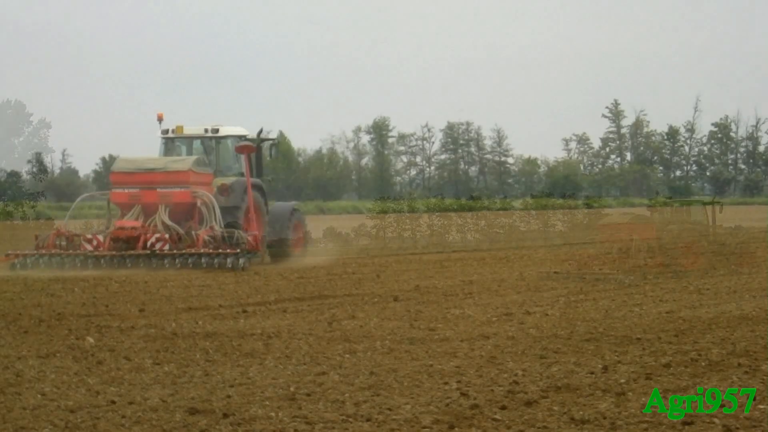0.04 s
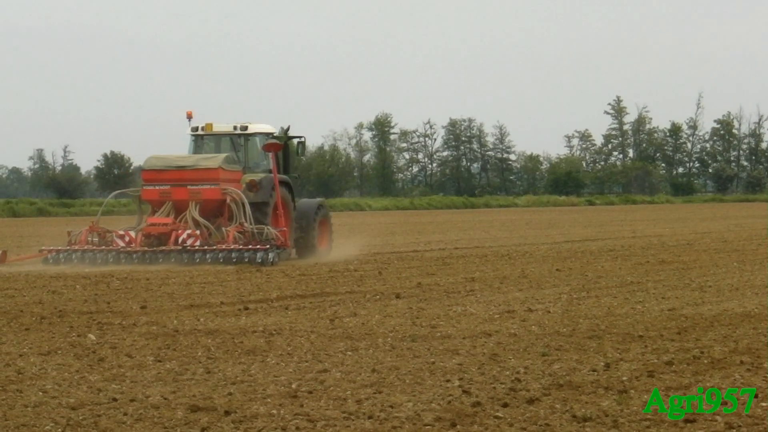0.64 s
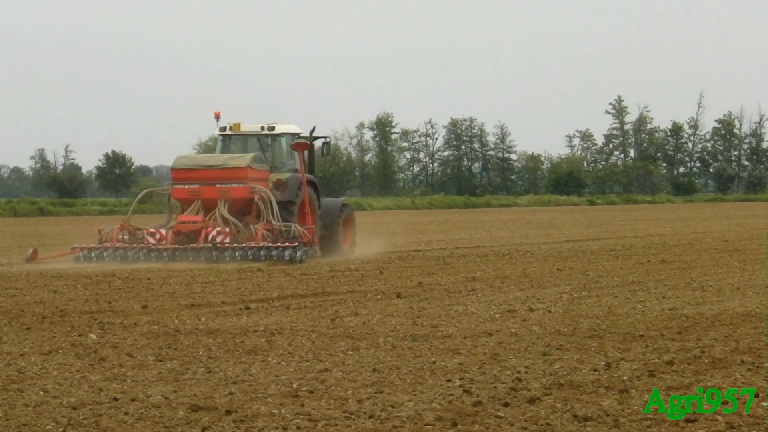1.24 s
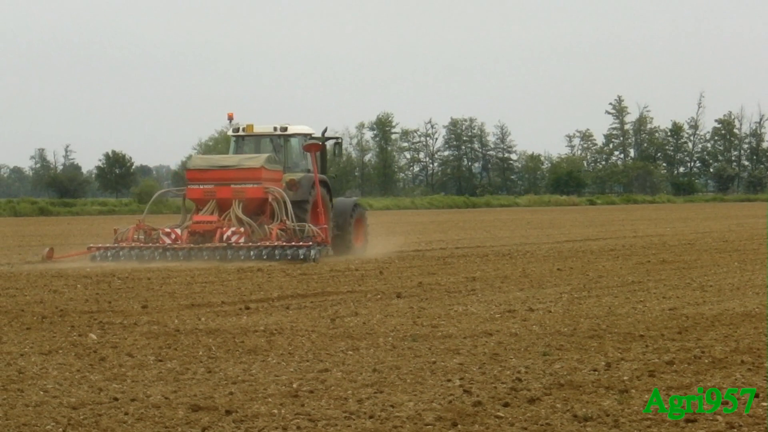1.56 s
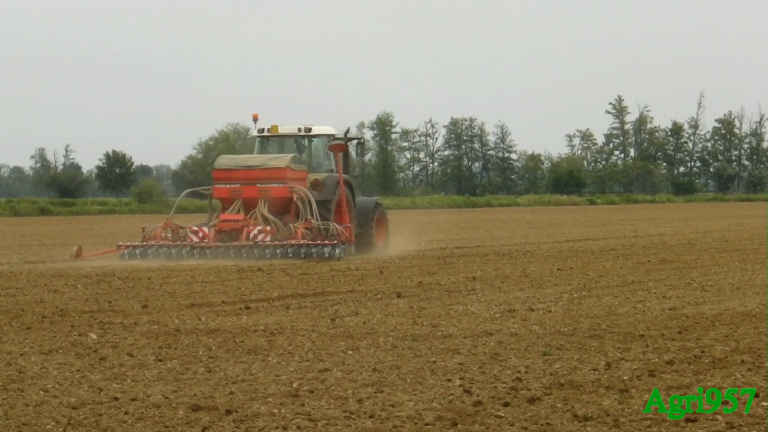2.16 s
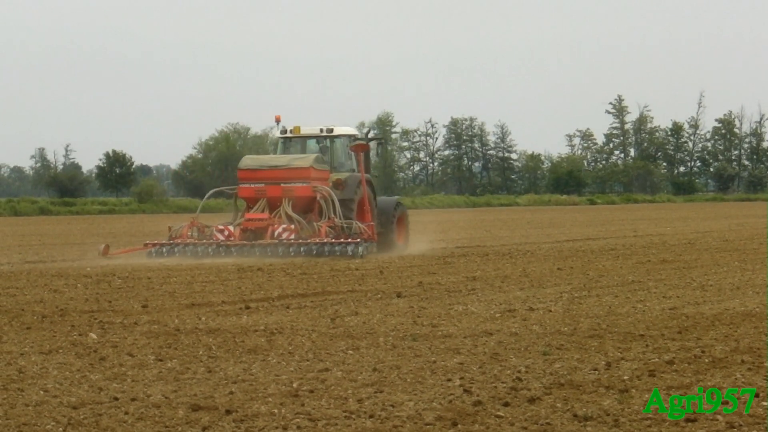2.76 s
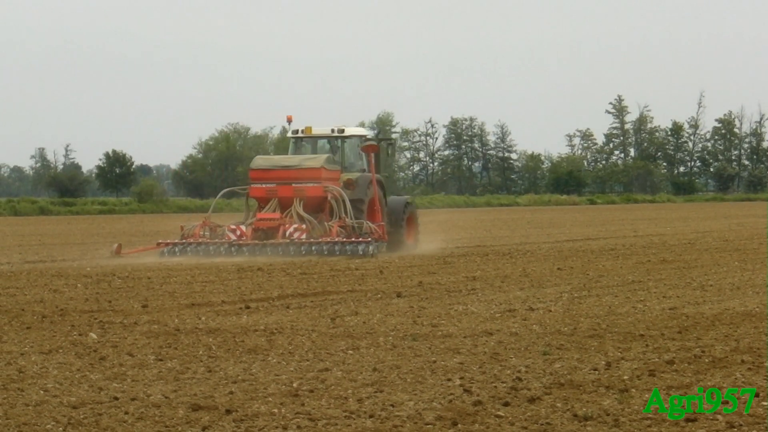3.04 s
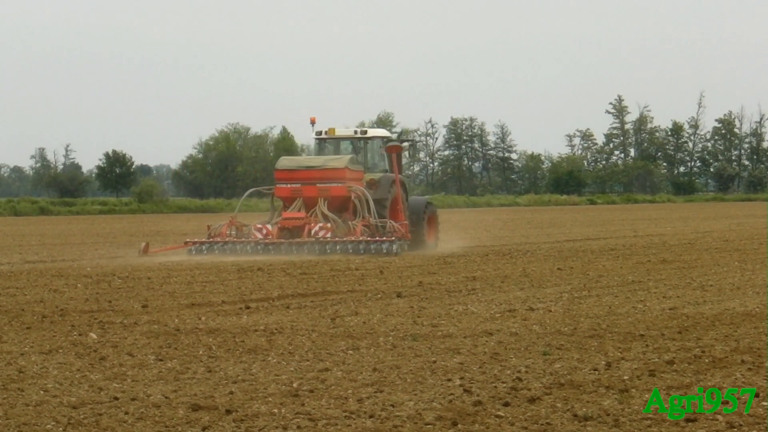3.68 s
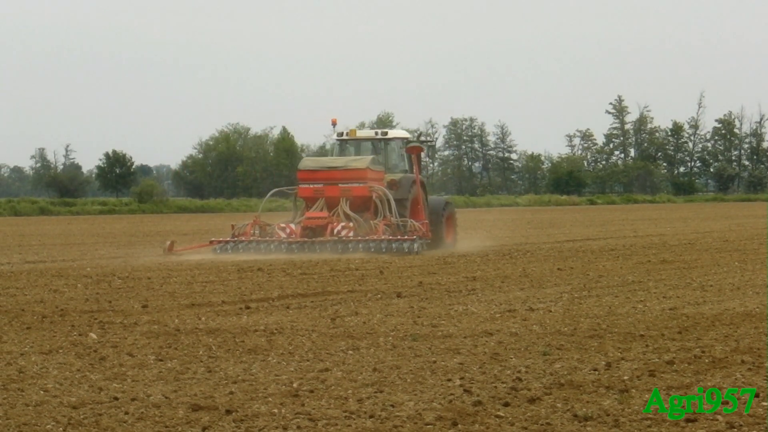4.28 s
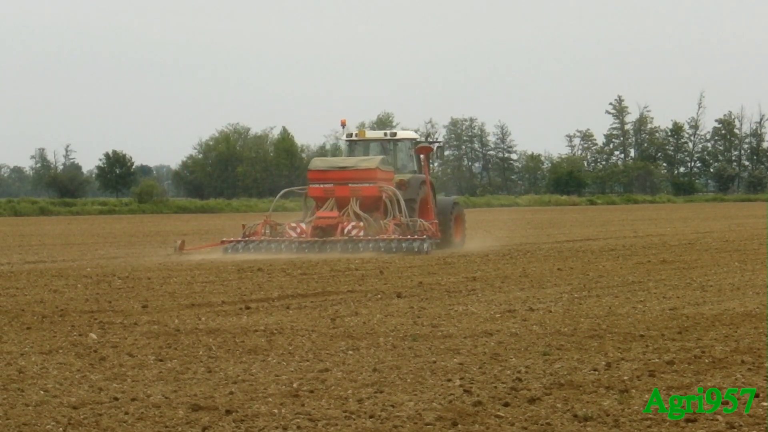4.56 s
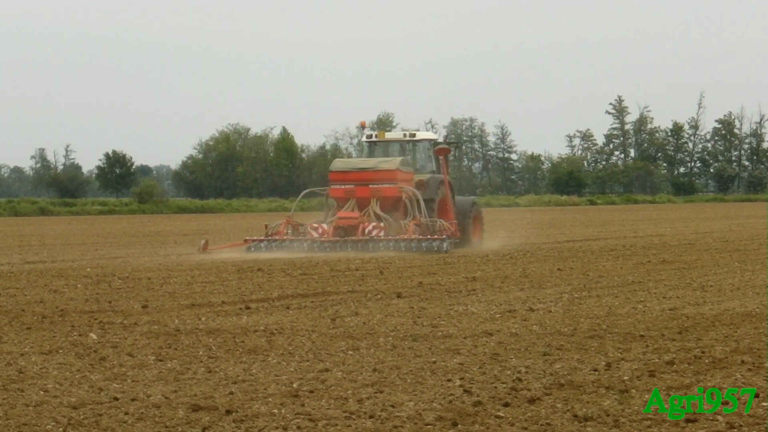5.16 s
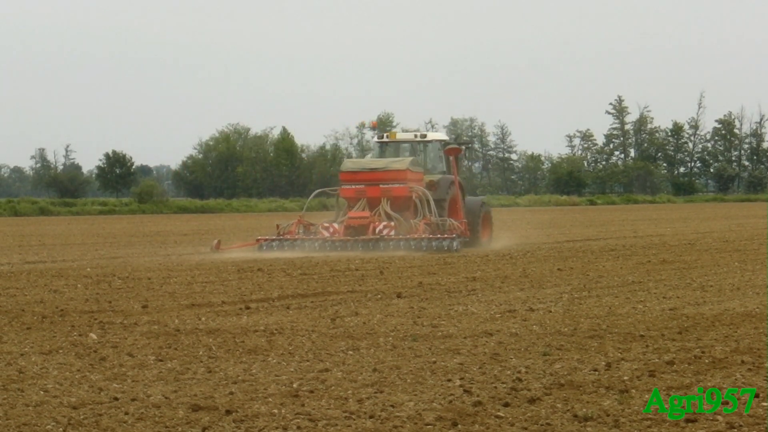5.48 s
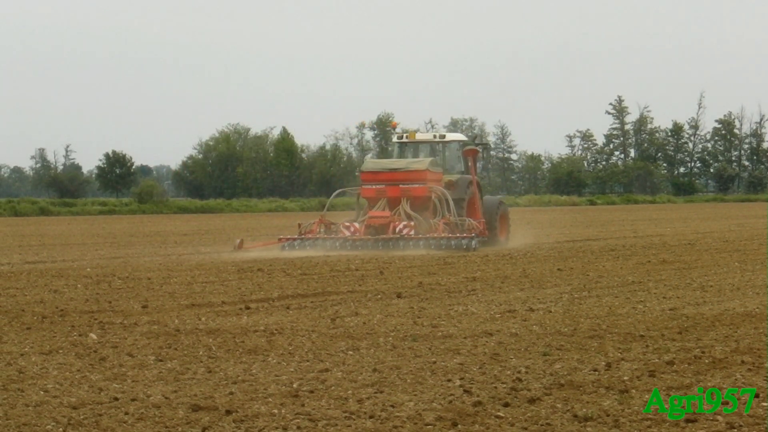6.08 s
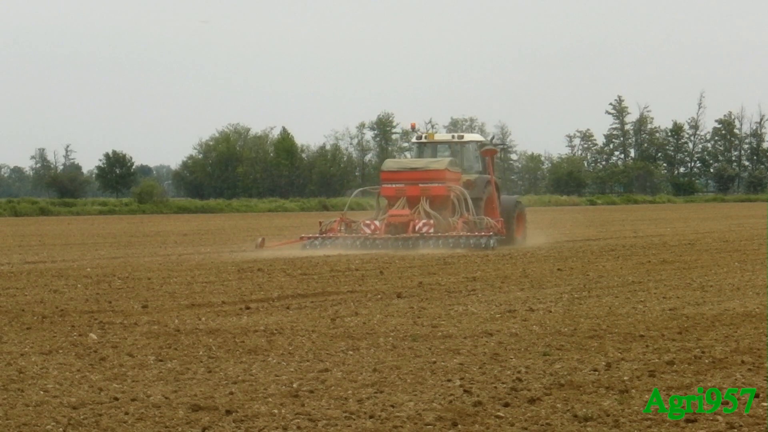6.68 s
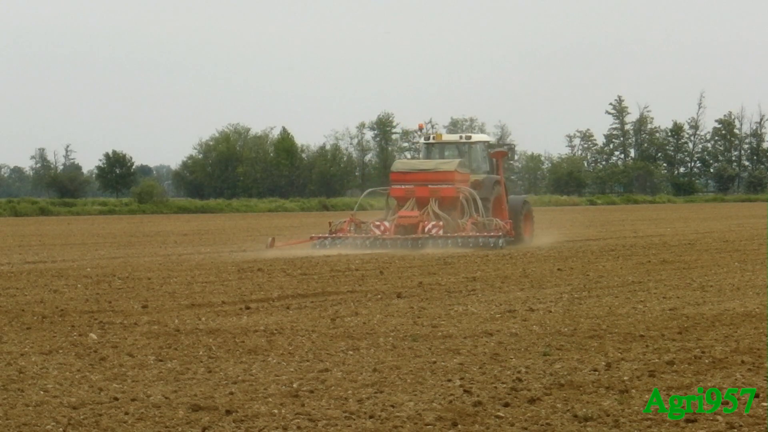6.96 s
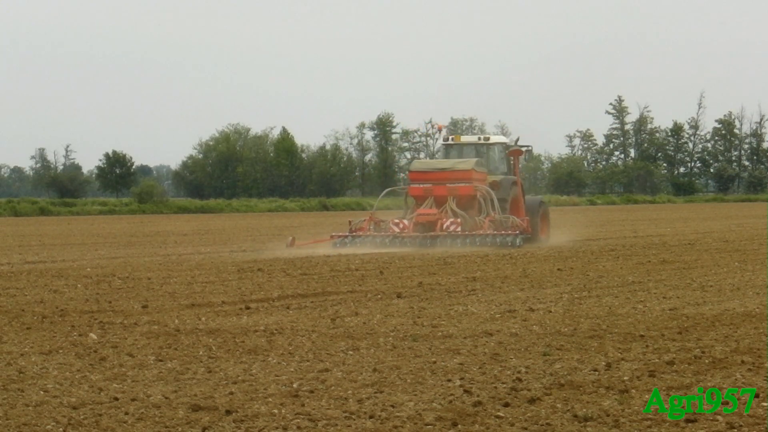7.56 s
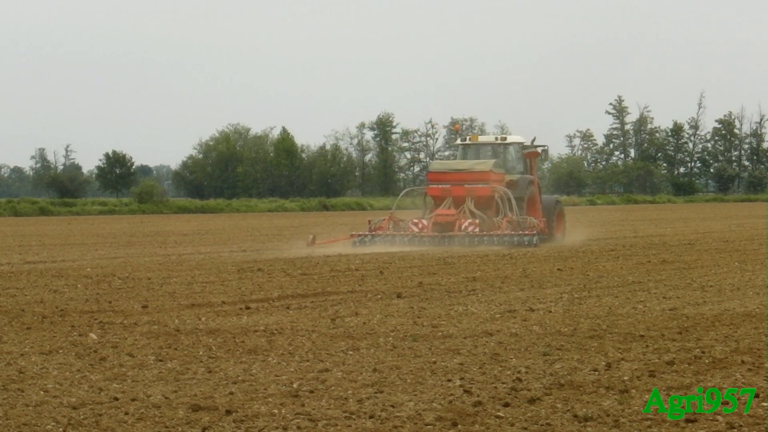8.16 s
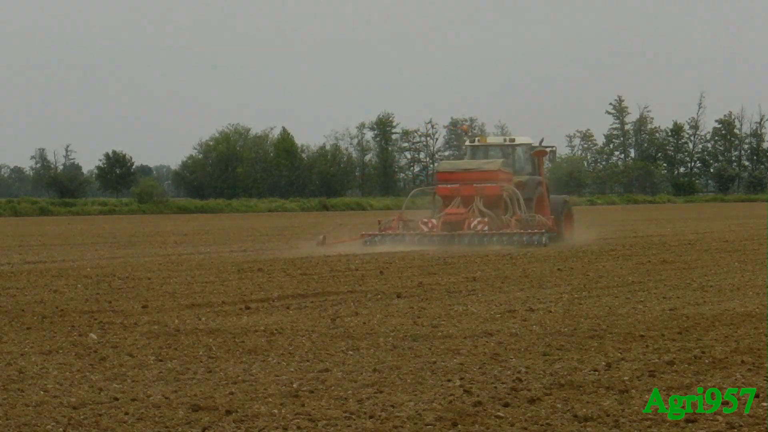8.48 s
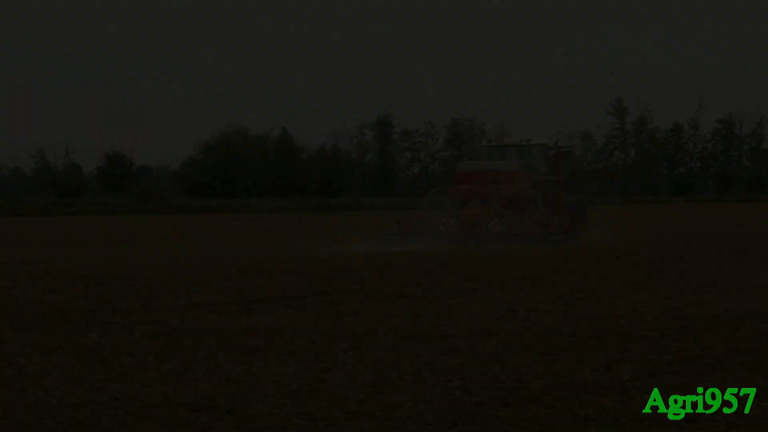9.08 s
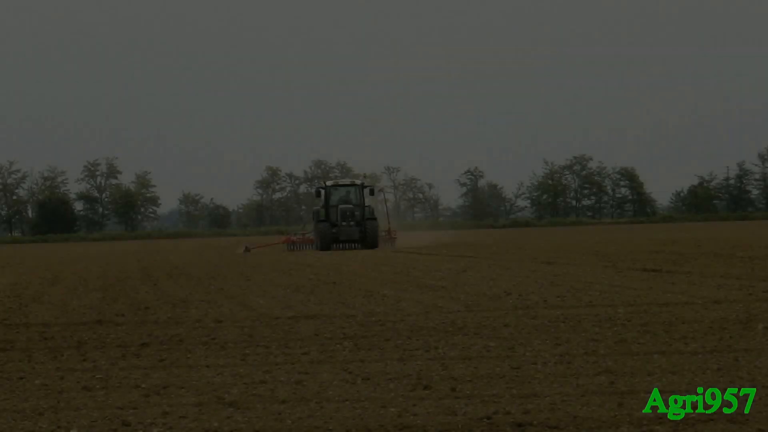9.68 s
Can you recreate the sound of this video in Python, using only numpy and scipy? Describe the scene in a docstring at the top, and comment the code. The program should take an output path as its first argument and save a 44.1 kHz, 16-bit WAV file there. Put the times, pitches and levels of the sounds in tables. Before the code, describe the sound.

A receding tractor's steady engine drone mixes with a seed drill's rushing air and churning soil, then fades to a dull, distant roar.

```python
"""A six-cylinder tractor drones away across an open field, its firing pulses exciting silencer resonances.
It pulls a pneumatic seed drill: turbulent air rushes from the blower, clods and stones ring the steel,
and tines churn dry soil about nine times a second. Ground reflection hollows the midrange, the field
scatters the roar, and light air buffets the microphone. The scene fades out, flickers briefly,
and fades in again on a tractor much farther off."""
import sys
import numpy as np
from scipy import signal
from scipy.fft import rfft, irfft, next_fast_len
from scipy.io import wavfile
from scipy.ndimage import uniform_filter1d, map_coordinates

SR = 44100
rng = np.random.default_rng(int(sys.argv[2]) if len(sys.argv) > 2 else 0)


def wav_record(signal):
    """Record a signal, one row per channel, as 16-bit PCM in the file named by sys.argv[1]."""
    frames = np.transpose(np.atleast_2d(signal))
    bounded = np.clip(frames, -1, 1)
    # unit amplitude maps onto the largest positive 16-bit level
    quanta = np.round(bounded * 32767).astype(np.int16)
    wavfile.write(sys.argv[1], SR, quanta)


N = 433503


# Harmonics of the two-revolution engine cycle: harmonic_number, relative_db
EXHAUST_HARMONICS = [(5, -31), (6, -16), (9, -13), (12, -6.5), (14, -25), (15, -19), (27, -23)]
# Resonances of the silencer and of the engine bay: centre_hz, width_hz, relative_db
SILENCER_MODES = [(139, 28, -5.5), (175.4, 21, 4.5), (208.7, 36, 1.5)]
BAY_MODES = [(552, 59, 0.5), (685, 50, -8.5), (960, 88, 3.5), (1113, 85, 4.5), (1200, 40, -5),
             (1410, 48, -1), (1556, 95, -1.5)]
# Knocks in the bay, relative to its rattle: peak_s, peak_db, rise_db_per_s, fall_db_per_s
BAY_KNOCKS = [(.535, -13, 600, 300), (.8, -9, 200, 120), (2.6, -1, 700, 400), (4.16, 11, 500, 400)]
def engine(firing_hz=102.3, cylinders=6):
    """Periodic excitation: firings drive silencer and bay; unequal cylinders add in-between harmonics."""
    cycle = 2 * np.pi * np.cumsum(firing_hz * (1 + .002 * wobble(3))) / SR / cylinders
    pulses = (1 + .25 * np.cos(cylinders * cycle)) * (1 + .35 * np.cos(cylinders / 2 * cycle))
    uneven = cycle + .042 * wobble(22) + .028 * wobble(8)  # phase jitter smears the higher harmonics
    tones = 0
    for harmonic, db in EXHAUST_HARMONICS:
        gain = amp(db - 0.5 + 1.7 * wobble(4.3) + 1.3 * wobble(13))
        phase = harmonic * uneven + 0.1 * wobble(6.3) + rng.uniform(0, 2 * np.pi)
        tones += gain * np.sqrt(2) * np.cos(phase)
    load_db = 3 * bump(peak_s=6.3, half_s=1.3)  # the engine pulls harder
    shadow_db = -bump(peak_s=4.45, half_s=1.15)  # the seed hopper screens the exhaust stack
    tones *= amp(load_db + 5 * shadow_db)
    gas = amp(-2.5 + 0.73 * wobble(15)) * stereo(noise() * pulses, resonances(SILENCER_MODES))
    exhaust = amp(-40.5 + spreading_db() + shadow_db) * (tones + gas)
    rattle = amp(-33 + flank_db() + 0.95 * wobble(7)) * stereo(noise() * pulses, resonances(BAY_MODES))
    return exhaust + (1 + swells(BAY_KNOCKS)) * rattle


def exhaust_thumps():
    """Random modulation of a low band: the exhaust thumps faintly and unevenly as it recedes."""
    thump_db = -75 + 0.5 * spreading_db() + 5.5 * wobble(8)
    return amp(thump_db) * stereo(noise(), resonances([(68, 12, 0)]))


def spreading_db(start_m=24.5, speed_m_per_s=3.22):
    """Spherical spreading: the receding tractor loses 6 dB for each doubling of distance."""
    return -20 * np.log10(1 + speed_m_per_s * clock() / start_m)


def flank_db(open_db=-2.5, hidden_db=-23, turn_s=3.42, half_s=0.71):
    """Directivity: the engine's flank is heard less as it turns away from the listener."""
    turned = (1 + np.tanh((clock() - turn_s) / half_s)) / 2
    return open_db + (hidden_db - open_db) * turned


# Working level of the seed drill: time_s, air_db, soil_db
DRILL_LEVELS = [(0.05, -27.5, -29.5), (0.09, -27.5, -28), (0.31, -27, -28.5), (1.2, -26, -28),
                (1.6, -26, -27), (2.0, -27.5, -27), (2.26, -28, -28.5), (2.94, -25.5, -25.5),
                (3.3, -26, -25), (3.52, -24.5, -25), (3.95, -26, -27), (4.9, -30, -30), (5.25, -30, -31),
                (5.86, -32.5, -32.5), (6.26, -35, -35), (7.13, -37, -34.5), (8.26, -35.5, -33),
                (8.5, -36, -34), (9.2, -33.5, -37.5)]
def seed_drill():
    """Superposition: the drill's parts sound together as its work rises and falls."""
    air_db, soil_db = curves(DRILL_LEVELS)
    return blower(air_db) + machinery(air_db) + roller() + coulters() + clinks() + soil(soil_db)


def churn(beat_hz=9.2, depth_db=0.36):
    """Amplitude modulation: the tines bite in a steady beat that wanders a little."""
    beat = 2 * np.pi * beat_hz * clock() + 0.25 * wobble(0.66)
    return amp(depth_db * np.cos(beat))


# Spectrum of the air in the seed hoses: frequency_hz, relative_db
HOSE_SPECTRUM = [(300, -47), (900, -29), (1500, -7.5), (2000, -3.5), (2700, -2), (3600, -1.5), (4800, -7.5),
                 (7000, -25), (12000, -60)]
# Resonances of the fan housing: centre_hz, width_hz, relative_db
FAN_MODES = [(2000, 94, 0), (2207, 100, 3), (2460, 100, -7)]
# Bursts of ringing, relative to the steady howl: peak_s, peak_db, rise_db_per_s, fall_db_per_s
FAN_BURSTS = [(.16, -3, 300, 300), (.325, 3, 300, 260), (.498, -8, 499, 400), (.58, -7, 400, 300),
              (.88, -7, 250, 200), (1.125, -6, 400, 140)]
def blower(air_db):
    """Turbulence and resonance: the hoses rush, and the fan housing howls as its intake sweeps past."""
    rush = amp(air_db - 0.48 + 0.41 * wobble(20)) * stereo(noise(), spectrum(HOSE_SPECTRUM))
    facing = swell(peak_s=0.54, peak_db=1.5, rise_db_per_s=8, fall_db_per_s=6.5)
    intake = np.maximum(facing, amp(-19))  # a faint howl remains with the intake hidden
    howl = amp(-33 + .5 * wobble(14)) * stereo(noise(), resonances(FAN_MODES))
    return rush + intake * (1 + swells(FAN_BURSTS)) * howl


# Spectrum of the gears and rollers: frequency_hz, relative_db
GEAR_SPECTRUM = [(20, -33), (47, -36), (70, -23), (110, -6), (250, -6.5), (330, -6), (450, -3.5),
                 (620, -1.5), (780, -0.5), (1200, 1), (1700, -0.5), (2600, -15.5), (6000, -47)]
# Resonances of the steel frame and of a disc: centre_hz, width_hz, relative_db
FRAME_MODES = [(557, 30, 0), (728, 130, -7), (912, 94, -4), (1135, 39, -1), (1215, 34, 1.5), (1377, 63, -3),
               (1855, 63, 0.5), (2030, 80, -2), (2250, 130, 1), (2525, 200, 1.5), (2790, 95, 1.5),
               (2970, 85, 0), (3350, 90, -4.5), (3724, 77, -0.5), (4230, 160, -6.5), (4440, 83, -3),
               (5370, 230, -4)]
DISC_MODES = [(2006, 130, -2.2), (2950, 130, 1), (3420, 90, -1.5)]
# The disc runs into stony ground: peak_s, peak_db, rise_db_per_s, fall_db_per_s
DISC_SCRAPES = [(2.4, -30.5, 26, 12), (5.5, -44, 12, 22), (6.4, -40, 31, 30)]
def machinery(air_db):
    """Impact and friction: gears and rollers rumble, clods ring the frame and a disc scrapes."""
    rumble_db = -32 + spreading_db() - 1.6 * amp(flank_db())  # screened at first by the tractor's flank
    rumble = amp(rumble_db + 0.47 * wobble(12)) * stereo(noise(), spectrum(GEAR_SPECTRUM))
    clatter_db = -33.5 + 0.54 * (air_db + 29) + 0.35 * wobble(16)
    frame = stereo(impacts(per_s=3000, spread_db=2), resonances(FRAME_MODES))
    clatter = amp(clatter_db) * shimmer(frame, depth_db=3)
    scrape = swells(DISC_SCRAPES) * amp(wobble(12)) * stereo(noise(), resonances(DISC_MODES))
    return rumble + clatter + scrape


# Spectra of sprayed soil and of fine grit: frequency_hz, relative_db
SPRAY_SPECTRUM = [(800, -41), (2500, -17), (3900, -5.5), (4900, -2.5), (5700, 0), (6400, -3), (7300, -8),
                  (8300, -11), (11000, -37)]
GRIT_SPECTRUM = [(3000, -45), (7000, 3.5), (8400, -2.5), (10000, -2.5), (11300, -8.5), (12500, -12.5),
                 (14000, -27), (15000, -24)]
# Extra grit from dusty patches, relative to the usual: peak_s, peak_db, rise_db_per_s, fall_db_per_s
DUST_PATCHES = [(1.1, -11, 1, 26), (8.1, -7, 21, 18)]
def soil(soil_db):
    """Shot noise: dry earth shatters on the tines and guards in impacts so dense that they hiss."""
    flutter_db = 0.47 * wobble(25)
    spray = stereo(noise() + 0.62 * impacts(per_s=5000, spread_db=2.5), spectrum(SPRAY_SPECTRUM))
    grit = stereo(noise() + .5 * impacts(per_s=4000, spread_db=-1.5), spectrum(GRIT_SPECTRUM))
    grit_db = -39.5 + 0.7 * (soil_db + 30)  # the grit swells less than the spray
    dust = 1 + swells(DUST_PATCHES)
    return amp(flutter_db) * (amp(soil_db - 0.02) * spray + dust * amp(grit_db) * grit)


# Resonances of the steel coulters: centre_hz, width_hz, relative_db
COULTER_MODES = [(2530, 120, -1.5), (2800, 190, -4)]
# Passes through firm clods: peak_s, peak_db, rise_db_per_s, fall_db_per_s
CLOD_GRINDS = [(3.9, -31, 90, 90), (4.13, -34.5, 110, 80), (4.7, -36, 70, 60), (5.48, -38, 30, 30),
               (6.093, -38, 200, 200), (6.47, -38.5, 90, 70), (6.538, -41, 400, 300), (7.43, -45, 80, 60),
               (7.66, -50, 60, 60), (7.9, -42.5, 45, 30), (8.95, -47, 25, 20)]
def coulters():
    """Frictional excitation: clods ring the coulters. A very faint, brief ping falls in the fade-out."""
    grind = swells(CLOD_GRINDS) * amp(0.67 * wobble(30)) * stereo(noise(), resonances(COULTER_MODES))
    ping = swell(peak_s=9.256, peak_db=-30, rise_db_per_s=900, fall_db_per_s=650)
    return grind + ping * stereo(noise(), resonances([(3270, 80, 0)]))


# Small stones striking the tines: peak_s, peak_db
STONE_STRIKES = [(1.09, -30), (1.3, -32), (1.855, -31), (3.115, -28), (3.47, -30), (5.415, -34.5),
                 (5.773, -39), (6.7, -40)]
# Resonances of the tines: centre_hz, width_hz, relative_db
TINE_MODES = [(4140, 150, -3), (4480, 110, -6)]
def clinks():
    """Damped vibration: tines struck by a stone ring and decay exponentially."""
    strikes = sum(swell(s, db, rise_db_per_s=2500, fall_db_per_s=200) for s, db in STONE_STRIKES)
    return strikes * stereo(noise(), resonances(TINE_MODES))


# Resonances of the hollow roller: centre_hz, width_hz, relative_db
ROLLER_MODES = [(322, 22, 1), (401, 20, 0.5)]
def roller():
    """Forced vibration: the hollow roller drums dully over a hard patch."""
    patch = swell(peak_s=3.9, peak_db=-49.5, rise_db_per_s=50, fall_db_per_s=11)
    return patch * stereo(noise(), resonances(ROLLER_MODES))


# Bands weakened by the ground reflection: centre_hz, width_hz, depth_fraction, deepest_s, half_s
CANCELLED_BANDS = [(330, 47, 0.3, 0.69, 1.8), (780, 49, 0.7, 1.2, 1.8), (690, 55, 0.28, 2.3, 0.7),
                   (1310, 61, .36, 0.7, 1.2), (1160, 99, 0.35, 2.55, 0.65), (1650, 130, 0.36, 2.2, 0.82),
                   (3140, 100, 0.2, 2.7, 0.6)]
def ground_reflection(direct):
    """Destructive interference: the bounce off the soil hollows each band for a while."""
    cancelled = 0
    for centre_hz, width_hz, depth, deepest_s, half_s in CANCELLED_BANDS:
        band = filtered(direct, lambda hz: np.exp(-((hz - centre_hz) / width_hz) ** 2))
        cancelled += depth * bump(deepest_s, half_s) * band
    return direct - cancelled


# Spectrum of the roar scattered by field and tree line: frequency_hz, relative_db
SCATTER_SPECTRUM = [(250, -29), (700, -2), (1400, -3.5), (2300, 0), (4200, -1), (5600, -14), (9000, -34)]
# Bands of a thin, wide hiss: centre_hz, width_hz, relative_db
HISS_BANDS = [(4050, 130, 0), (4550, 170, -2), (4980, 170, -2)]
def surroundings(hiss_end_s=1.74, hiss_fade_s=0.6):
    """Diffuse field: scattered sound arrives from all sides; at first a thin hiss spreads wide too."""
    scatter = amp(-43.5 + 0.58 * wobble(2.3)) * unit(filtered(noise(), spectrum(SCATTER_SPECTRUM)))
    antiphase_hiss = np.array([[1], [-1]]) * unit(filtered(noise()[0], resonances(HISS_BANDS)))
    return scatter + amp(-39.5) * fade(hiss_end_s, hiss_end_s - hiss_fade_s) * antiphase_hiss


# Spectrum of the distant tractor: frequency_hz, relative_db
DISTANT_SPECTRUM = [(30, -14), (48, -20), (65, -17), (106, 1), (135, -6), (185, 1.5), (258, -6), (390, 0),
                    (524, -4), (927, 1), (1640, -4.5), (2590, -1.5), (3040, -7.5), (3560, -7), (4270, -12),
                    (14000, -29.5)]
# Its resonances: centre_hz, width_hz, relative_db
DISTANT_MODES = [(395, 40, 0), (930, 110, 0), (2550, 150, 3), (3500, 320, -8)]
def distant_tractor():
    """Attenuation with distance: only a dull roar with a few resonances is left."""
    roar = amp(-47.5) * stereo(noise(), spectrum(DISTANT_SPECTRUM))
    return roar + amp(-59) * stereo(noise(), resonances(DISTANT_MODES))


# Spectrum of air buffeting the microphone: frequency_hz, relative_db
BUFFET_SPECTRUM = [(14, -4), (22, 3), (30, 3), (40, -6), (48, -20), (62, -14), (90, -22), (200, -49)]
# Puffs, relative to the light air: peak_s, peak_db, rise_db_per_s, fall_db_per_s
AIR_PUFFS = [(.02, 16, 60, 70), (.6, 9, 110, 110), (1.0, 16, 130, 130), (1.7, 15, 71, 29),
             (2.46, 11, 110, 110), (3.1, 14, 50, 30), (3.42, 10, 60, 80), (3.95, 9, 40, 70),
             (5.65, 4, 60, 30), (6.45, 3, 30, 50), (7.7, 9, 40, 20)]
def breeze():
    """Pressure fluctuation: light air bumps the microphone and stirs each port on its own."""
    buffet = amp(-83.5 + 2 * wobble(11)) * stereo(noise(), spectrum(BUFFET_SPECTRUM))
    ports = amp(-70 + wobble(6)) * unit(filtered(noise(), resonances([(115, 49, 0)])))
    return (1 + swells(AIR_PUFFS)) * buffet + ports


# Likeness of the left and right channels: frequency_hz, correlation
COHERENCE = [(30, 0.85), (60, 0.8), (110, 0.98), (200, 0.95), (370, 0.88), (680, 0.95), (1250, 0.9),
             (2290, 0.94), (4200, 0.91), (6500, 0.92), (8500, 0.75), (11000, 0.63), (14200, 1)]
def stereo(pair, response):
    """Partial coherence: two unrelated signals, filtered as mid and side, form a narrow pair of rms 1."""
    angle = lambda hz: np.arccos(np.clip(along(COHERENCE, hz), 0, .995)) / 2
    weights = lambda hz: np.array([np.cos(angle(hz)), np.sin(angle(hz))])
    mid, side = filtered(pair, lambda hz: response(hz) * weights(hz))
    return unit(np.array([mid + side, mid - side]))


def shimmer(x, depth_db):
    """Random modulation: each narrow band swells and sinks on its own, a few times a second."""
    bands = signal.stft(x, nperseg=1024)[2]
    drift = uniform_filter1d(rng.standard_normal(bands.shape[1:]), size=3, axis=0)
    drift = uniform_filter1d(drift, size=12, axis=1)
    return unit(signal.istft(bands * amp(depth_db * unit(drift)), nperseg=1024)[1][:, :N])


def impacts(per_s, spread_db):
    """A Poisson stream of tiny impulses of uneven size."""
    return unit((rng.random((2, N)) < per_s / SR) * noise() * amp(spread_db * np.clip(noise(), -2, 2)))


def noise():
    """Two uncorrelated white noises."""
    return rng.standard_normal((2, N))


def wobble(knots_per_s):
    """A smooth curve through random knots."""
    knots = rng.standard_normal(int(N * knots_per_s / SR) + 4)
    return map_coordinates(knots, [np.arange(N) * knots_per_s / SR])


def filtered(x, response):
    """Linear filtering: the spectrum of x times a frequency response."""
    size = next_fast_len(N + 8192)
    return irfft(rfft(x, size) * response(np.fft.rfftfreq(size, 1 / SR)), size)[..., :N]


def resonances(modes):
    """The response of steep-sided (centre_hz, width_hz, relative_db) resonances, added in power."""
    def response(hz):
        peak = lambda centre, width: 1 / (1 + 2 * ((hz ** 2 - centre ** 2) / (2 * width * hz + 1)) ** 2)
        return np.sqrt(sum((amp(db) * peak(centre, width)) ** 2 for centre, width, db in modes))
    return response


def spectrum(points):
    """The response through (frequency_hz, relative_db) points."""
    return lambda hz: amp(along(points, hz))


def along(points, hz):
    """Interpolation on a logarithmic frequency axis."""
    frequencies, values = np.transpose(points)
    return np.interp(np.log(hz + 1), np.log(frequencies + 1), values)


def curves(rows):
    """One value per sample for each column after the time."""
    times, *columns = np.transpose(rows)
    return [np.interp(clock(), times, column) for column in columns]


def swell(peak_s, peak_db, rise_db_per_s, fall_db_per_s):
    """Exponential growth to a peak, then exponential decay."""
    t = clock() - peak_s
    return amp(peak_db + np.minimum(rise_db_per_s * t, -fall_db_per_s * t))


def swells(rows):
    """The summed gains of a table of swells."""
    return sum(swell(*row) for row in rows)


def bump(peak_s, half_s):
    """A Gaussian window of height 1."""
    return np.exp(-((clock() - peak_s) / half_s) ** 2)


def fade(silent_s, full_s):
    """A linear ramp between silence and full gain."""
    return np.clip((clock() - silent_s) / (full_s - silent_s), 0, 1)


def clock():
    """The time of each sample in seconds."""
    return np.arange(N) / SR


def amp(db):
    """Decibels to gain."""
    return 10 ** (np.asarray(db) / 20)


def unit(x):
    """x at rms 1."""
    return x / np.sqrt(np.mean(x ** 2) + 1e-20)


def scene():
    """Superposition: the near sources fade out together and flicker once; the far tractor fades in."""
    drill = seed_drill()
    near = ground_reflection(engine() + churn() * drill) + surroundings() + breeze() + exhaust_thumps()
    flicker = amp(-29) * fade(silent_s=9.34, full_s=9.38) * (clock() < 9.38)
    near_gain = fade(silent_s=9.335, full_s=8.36) + flicker
    return near * near_gain + distant_tractor() * fade(silent_s=9.335, full_s=9.83)


# Channel imbalance of the microphone: frequency_hz, left_minus_right_db
BALANCE = [(60, -1), (150, -2.0), (370, -2), (920, -1.5), (2290, -0.5), (5690, 0.0), (14200, -1.0)]
def record(dry, notch_hz=7890, top_hz=14400):
    """Frequency response: the microphone leans slightly right, with a treble notch and a band limit."""
    balance = lambda hz: amp(np.array([along(BALANCE, hz), -along(BALANCE, hz)]) / 2)
    notch = lambda hz: abs(hz - notch_hz) / np.hypot(hz - notch_hz, 190)
    return filtered(dry, lambda hz: balance(hz) * notch(hz) * (hz < top_hz))


dry = scene()
out = record(dry)
wav_record(out)
```